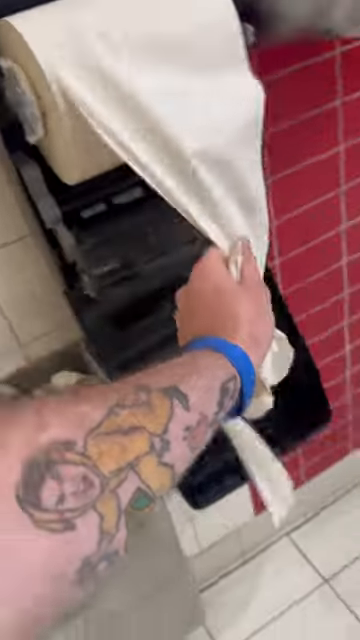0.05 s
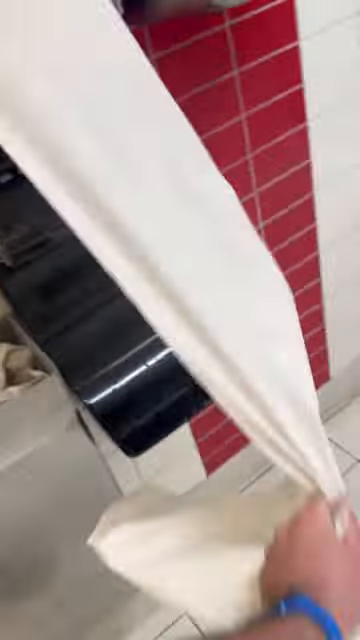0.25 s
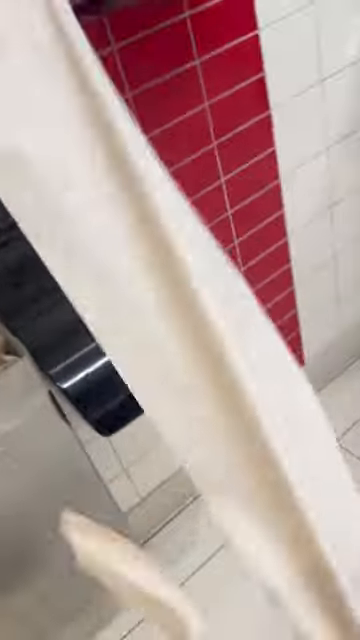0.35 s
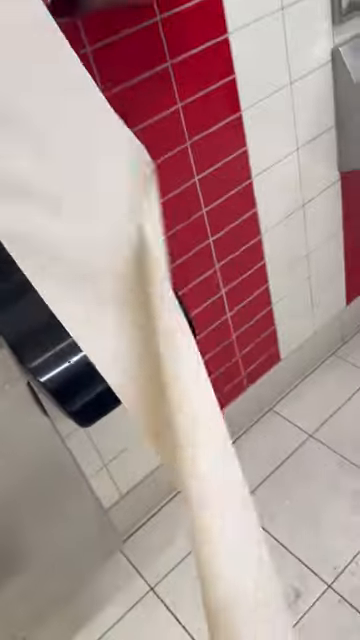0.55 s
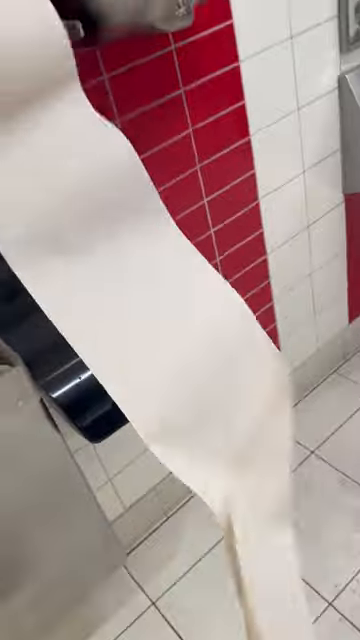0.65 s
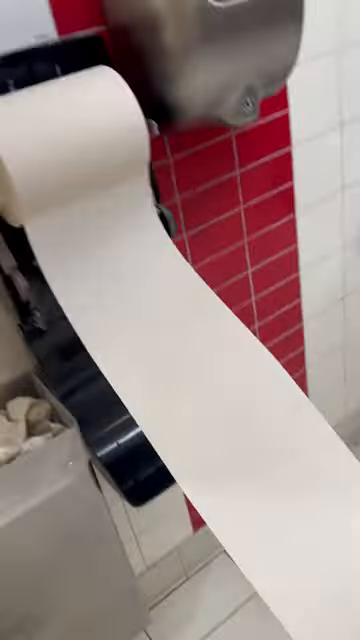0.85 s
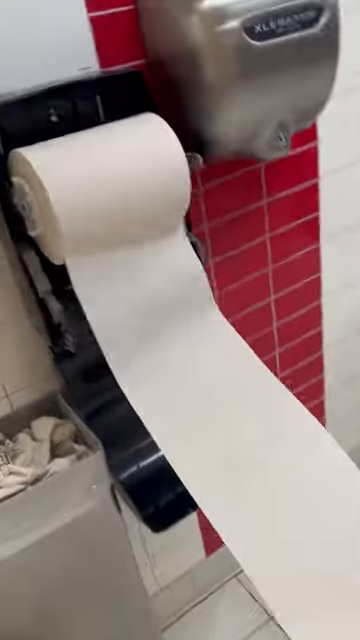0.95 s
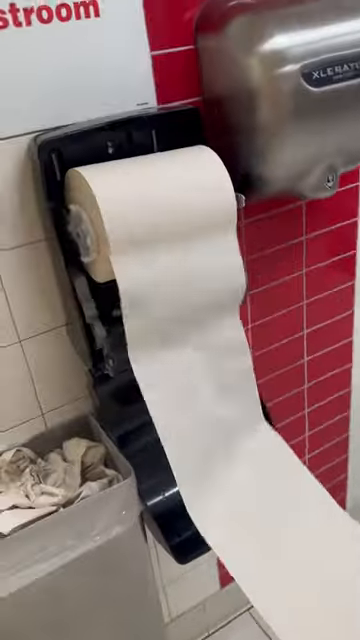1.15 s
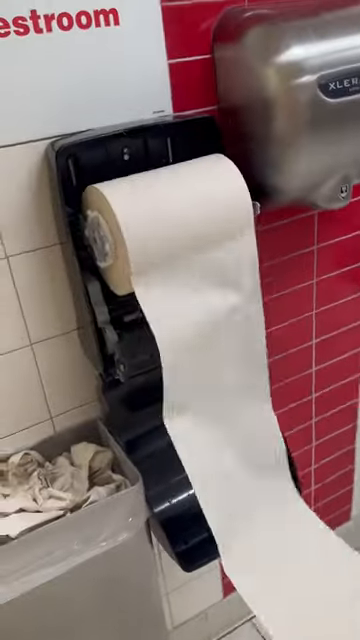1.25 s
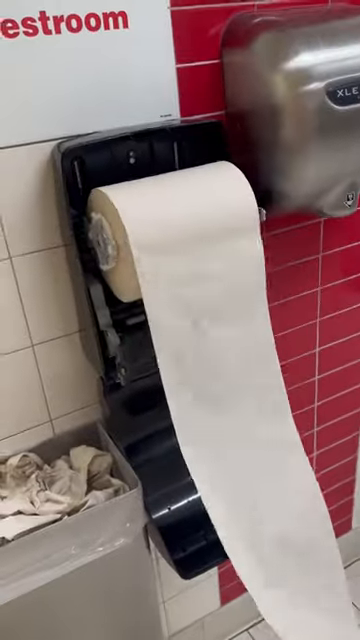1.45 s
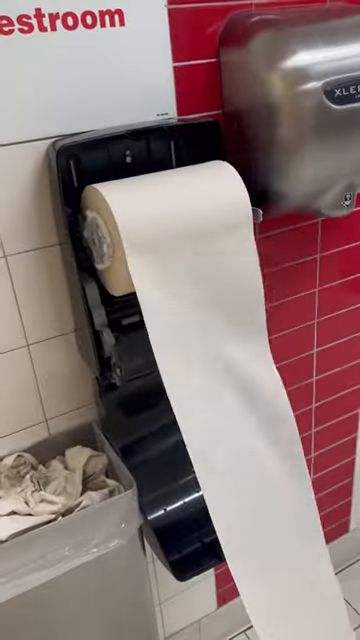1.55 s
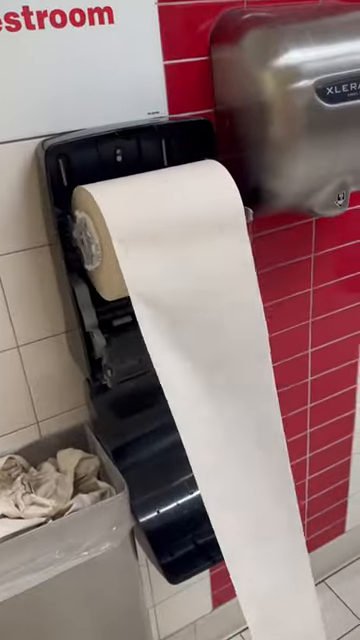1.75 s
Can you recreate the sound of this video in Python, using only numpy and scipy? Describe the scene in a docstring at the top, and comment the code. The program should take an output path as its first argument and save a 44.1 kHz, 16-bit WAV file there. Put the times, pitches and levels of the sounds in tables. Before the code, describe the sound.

A long paper towel sheet is yanked off its roll, rustling and snapping in a tiled restroom

```python
"""First comes a faint crackle of paper, then a long sheet of paper towel is yanked off its roll.
It flutters, hisses, snaps and pops in a tiled restroom: shaped noise bursts and short ringing tones.
The roll chatters in its open wall dispenser, a little to the left: random clicks ring its holder and
the plastic housing, and unsteady tones hum along. The roll fades and the hard room rings on."""
import sys
import numpy as np
from scipy import signal
from scipy.fft import rfft, irfft, next_fast_len
from scipy.io import wavfile
from scipy.ndimage import map_coordinates

SR = 44100
rng = np.random.default_rng(int(sys.argv[2]) if len(sys.argv) > 2 else 0)


def write(x):
    x = np.atleast_2d(x).T
    wavfile.write(sys.argv[1], SR, np.round(np.clip(x, -1, 1) * 32767).astype(np.int16))

N = 79380  # samples, 1.8 s
T = np.arange(N) / SR  # time of each sample, s
# In all tables, level_db is relative: the functions scale and mix the layers further.


def amp(db):
    """Turn decibels into a gain."""
    return 10 ** (np.asarray(db) / 20)


def unit(x):
    """Scale to an average strength (rms) of 1."""
    return x / np.sqrt(np.mean(x ** 2) + 1e-20)


def along(points, hz):
    """Read a table of (frequency, value) points on a log frequency axis."""
    f, v = np.transpose(points)
    return np.interp(np.log(hz + 1), np.log(f + 1), v)


def level(points):
    """Draw a gain for every sample through (time_s, level_db) points."""
    return amp(np.interp(T, *np.transpose(points)))


def filtered(x, response):
    """Multiply the spectrum of x by a response that depends on frequency."""
    m = next_fast_len(N + SR // 2)  # spare room so that the end does not wrap round
    spectrum = rfft(x, m) * response(np.fft.rfftfreq(m, 1 / SR))
    return irfft(spectrum, m)[..., :N]


def coloured(x, colour, size=2048):
    """Colour a sound without smearing it backwards in time; white noise keeps its power."""
    gain = unit(amp(along(colour, np.fft.rfftfreq(size, 1 / SR))))
    # folding the cepstrum puts the filter's energy as early as possible
    cepstrum = irfft(np.log(gain + 1e-6))
    cepstrum[1:size // 2] *= 2
    cepstrum[size // 2 + 1:] = 0
    impulse = irfft(np.exp(rfft(cepstrum)))
    return signal.fftconvolve(x, impulse[None], axes=1)[:, :N]


def resonate(x, modes, treble_hz=2000):
    """Ring a body's modes with x; the treble above about 2 kHz is weakened."""
    def response(f):
        ring = sum(amp(db) * 1j * f * w / (hz * hz - f * f + 1j * f * w) for hz, w, db in modes)
        return ring / (1 + 1j * f / treble_hz) ** 2
    return unit(filtered(x, response))


def spread(pair, side_db):
    """Use two unrelated signals as middle and side, and turn them into left and right."""
    side = amp(side_db)
    return np.array([pair[0] + side * pair[1], pair[0] - side * pair[1]]) / np.sqrt(1 + side ** 2)


def pan(left_db):
    """Channel gains that make the left louder than the right by left_db."""
    g = amp(np.array([[left_db], [-left_db]]) / 2)
    return g / g.mean()


def crackle(rate, scatter_db, smooth):
    """Two unrelated streams of tiny random clicks (rate a second) plus a share of even friction noise."""
    happens = rng.random((2, N)) < rate / SR
    sign = np.sign(rng.standard_normal((2, N)))
    size = amp(scatter_db * np.clip(rng.standard_normal((2, N)), -2, 2))
    return unit(unit(happens * sign * size) + smooth * rng.standard_normal((2, N)))


def wobble(rate):
    """A smooth random curve with rate knots a second."""
    return map_coordinates(rng.standard_normal(int(N * rate / SR) + 4), [T * rate])


def tone(hz, wander, rough_db):
    """A sine of rms 1 whose pitch (by the share wander) and level waver."""
    wavering_hz = hz * (1 + wander * wobble(90.2))
    sine = np.sin(2 * np.pi * np.cumsum(wavering_hz) / SR)
    return unit(sine * amp(rough_db * wobble(34.83)))


# how fast the tiled room dies away: frequency_hz, time_to_fall_60_db_s
TILE_DECAY = [(100, 1.4), (400, 1.18), (1200, 1.71), (3000, 0.92), (6500, 0.6), (9800, 0.23), (11500, 0.1)]


def room(x, gap_s=0.0073):
    """The dense tail of the tiled room: fading noise in which each frequency dies at its own speed."""
    hz, t, z = signal.stft(rng.standard_normal((2, SR)), SR, nperseg=256)
    fade = amp(-60 * t / along(TILE_DECAY, hz)[:, None])
    tail = signal.istft(z * fade, SR, nperseg=256)[1][:, :SR]
    build_up = 1 - np.exp(-(T[:SR] / gap_s) ** 2)
    tail *= build_up / np.sqrt(SR / np.log(10 ** 6))
    return signal.fftconvolve(x, tail, axes=1)[:, :N]


WALL_DELAY_S, WALL_SPREAD_S, WALL_DB = .011, .02, -10  # first delay, spread of delays, level


def walls(x, count=10):
    """A few early echoes from the nearest tiled walls, at random delays."""
    taps = np.zeros((2, SR // 8))
    for side in taps:
        delays = np.clip(WALL_DELAY_S + WALL_SPREAD_S * rng.random(count), 0, .1)
        side[(delays * SR).astype(int)] = rng.choice([-1, 1], count) / np.sqrt(count)
    return amp(WALL_DB) * signal.fftconvolve(x, taps, axes=1)[:, :N]


# loudness of the roll's low rumble: time_s, level_db
RUMBLE_LEVEL = [(0, -43), (.2, -43.5), (.244, -24), (.33, -28), (.39, -22), (.48, -28.5), (.556, -24.5),
                (.636, -33.5), (.722, -29), (1.098, -33.5), (1.348, -33.5), (1.484, -44), (1.574, -37),
                (1.8, -48.5)]
# tones at which the roll rings on its holder: pitch_hz, width_hz, level_db
HOLDER_MODES = [(133, 12.3, 4), (156.7, 15, 2.5), (189.8, 14, -.5), (223.7, 14, -0.5), (280, 22, -5)]
# loudness of the deep boom of wall and room: time_s, level_db
BOOM_LEVEL = [(0, -48), (.05, -46), (.18, -39.5), (.25, -35), (.6, -39.5), (.87, -29.5), (1.05, -33),
              (1.3, -32), (1.48, -39.5), (1.7, -36.5), (1.8, -48)]
# tone colour of that boom: frequency_hz, level_db
BOOM_TONE = [(15, -24), (32, -15), (45, -15), (58, -21), (66, 4), (76, -6), (92, -3.5), (115, -17.5),
             (250, -11.5), (1000, -80)]


def rumble():
    """The roll's clicks ring its holder's low modes; wall and room boom beneath as deep noise."""
    chatter = spread(crackle(rate=330, scatter_db=0.0, smooth=0.89), side_db=-19)
    holder = resonate(chatter, HOLDER_MODES)
    noise = spread(rng.standard_normal((2, N)), side_db=-29)
    boom = unit(filtered(noise, lambda hz: amp(along(BOOM_TONE, hz))))
    roll = amp(1.2) * holder * level(RUMBLE_LEVEL) * pan(left_db=6.0)
    return roll + boom * level(BOOM_LEVEL) * pan(left_db=4.5)


# loudness of the spinning roll's chatter: time_s, level_db
CHATTER_LEVEL = [(0, -49), (.08, -45), (.13, -37), (.2, -44), (.25, -30), (.32, -25), (.41, -21),
                 (.545, -23.5), (.62, -23.5), (.74, -26), (.88, -24), (1.07, -32), (1.15, -29.5),
                 (1.3, -32.5), (1.43, -36), (1.5, -39.5), (1.62, -41), (1.8, -48)]
# tones at which the plastic housing rings: pitch_hz, width_hz, level_db
HOUSING_MODES = [(369.6, 37, -3.5), (398, 30, -0.5), (441.2, 31, 2), (486.3, 17, 0.5), (613, 18, 3.5),
                 (678.5, 25, 4)]
# hum of the whirring core, rising and falling to a lower end: time_s, pitch_hz, level_db
CORE_HUM = [(.25, 478.6, -39), (.34, 456.3, -24), (.41, 432.7, -20.5), (.48, 420.4, -25), (.54, 369.3, -16),
            (.58, 368, -23), (0.631, 384.7, -32), (0.691, 414.7, -21.5), (.75, 437, -17.5),
            (.79, 400.2, -28), (0.848, 360.4, -20), (.91, 372.4, -38), (1.001, 403.9, -27),
            (1.07, 400.2, -39), (1.14, 378.2, -22.5), (1.22, 348, -30.5), (1.4, 343.6, -43),
            (1.8, 340, -57)]
# loudness of the housing's singing lowest mode: time_s, level_db
SING_LEVEL = [(.25, -48), (.46, -31), (.62, -42), (.73, -23.5), (0.852, -23.5), (.97, -26.5), (1.08, -41.5),
              (1.16, -22), (1.28, -26.5), (1.42, -32), (1.49, -48), (1.54, -31), (1.62, -45.5),
              (1.8, -50.5)]
SING_HZ = 326
HUM_WANDER, SING_WANDER = .02, .022  # unsteadiness, as a share of the pitch


def whirr(reach_octaves=.4):
    """The core hums unsteadily; its chatter rings the housing's modes, most strongly near its pitch."""
    s, pitch_hz, hum_db = np.transpose(CORE_HUM)
    centre_hz = np.interp(T, s, pitch_hz)
    chatter = spread(crackle(rate=900, scatter_db=1, smooth=1.0), side_db=-22)
    # a mode is weighted less the further, in octaves, it lies from the hum
    weights = np.array([amp(db) / (1 + (np.log2(hz / centre_hz) / reach_octaves) ** 2)
                        for hz, width, db in HOUSING_MODES])
    weights /= np.linalg.norm(weights, axis=0)
    drone = sum(w * resonate(chatter, [mode]) for w, mode in zip(weights, HOUSING_MODES))
    hum = tone(centre_hz, HUM_WANDER, rough_db=1) * amp(np.interp(T, s, hum_db))
    sing = tone(SING_HZ, SING_WANDER, rough_db=2.0) * level(SING_LEVEL)
    mix = amp(-1) * drone * level(CHATTER_LEVEL) + amp(-4.5) * hum + amp(-2.5) * sing
    return mix * pan(left_db=10)


# loudness of the moving sheet's flutter: time_s, level_db
FLUTTER_LEVEL = [(0, -49), (.08, -43.5), (.13, -35.5), (.205, -33), (.24, -15), (.325, -20.5), (.37, -19),
                 (.53, -16.5), (.63, -23.5), (.78, -21.5), (.86, -15.5), (.93, -27.5), (1.08, -25.5),
                 (1.14, -25), (1.28, -22), (1.42, -29), (1.6, -31.5), (1.8, -48.5)]
# tone colour of the flutter: frequency_hz, level_db
FLUTTER_TONE = [(120, -14), (260, -8.5), (500, 0), (750, 0), (1050, 0.5), (1400, -2), (1800, -12),
                (2600, -9), (3200, -14.5), (4200, -19), (6000, -37.5), (10000, -55), (12000, -80)]
# loudness of the hiss of sliding paper: time_s, level_db
SLIDE_LEVEL = [(0, -38.5), (.1, -34.5), (.23, -39), (.26, -28), (.33, -42), (.4, -22), (.54, -28),
               (.63, -30), (.74, -23.5), (.87, -28.5), (1.06, -32), (1.16, -27.5), (1.3, -30.5),
               (1.45, -42), (1.8, -55)]
# tone colour of that hiss: frequency_hz, level_db
SLIDE_TONE = [(800, -23), (2400, 2), (3700, -0.5), (4900, -2.5), (6200, -1.5), (7500, -1.5), (9700, -10.5),
              (10800, -54), (16000, -52)]
CLUMP_DB, CLUMPS_PER_S = 1.4, 70  # depth and speed of the unevenness


def sheet():
    """The running sheet flutters in coarse grains and hisses in fine ones, both in uneven clumps."""
    clumps = unit(amp(CLUMP_DB * wobble(CLUMPS_PER_S)))
    coarse = crackle(rate=500, scatter_db=0.5, smooth=0.62) * clumps
    flutter = coloured(coarse * level(FLUTTER_LEVEL), FLUTTER_TONE)
    fine = crackle(rate=1200, scatter_db=-1.0, smooth=0.9) * np.sqrt(clumps)
    slide = coloured(fine * level(SLIDE_LEVEL), SLIDE_TONE)
    return amp(-1.5) * flutter + amp(-3.5) * slide


# tone colour of the small creases: frequency_hz, level_db
CREASE_TONE = [(400, -18.5), (1200, 7), (2300, 0), (3600, -5), (6200, -9), (9500, -20.5), (11000, -52)]
CREASES_PER_S, CREASE_T60_S = 110, .01  # how many; time for each to fall by 60 dB
CREASE_SCATTER_DB, CREASE_DB = 2.5, -6.5  # scatter of size; level


def crinkles():
    """Small creases tick at random as short noise bursts, harder when the sheet flutters and slides more."""
    happens = rng.random(N) < CREASES_PER_S / SR
    # twice the decibels, because these are powers
    starts = happens * amp(2 * CREASE_SCATTER_DB * np.clip(rng.standard_normal(N), -2, 2))
    power = np.abs(signal.fftconvolve(starts, amp(-60 * T / CREASE_T60_S) ** 2)[:N])
    ticks = unit(np.sqrt(power) * rng.standard_normal((2, N)))
    effort = np.sqrt(level(FLUTTER_LEVEL) * level(SLIDE_LEVEL))
    return amp(CREASE_DB) * coloured(ticks * effort, CREASE_TONE)


# hollow pops as the sheet buckles: start_s, level_db, pitch_hz, time_to_fall_60_db_s
BUCKLES = [(.09, -19, 1180, 0.035), (.124, -21, 1025, .04), (.157, -17.5, 1093, 0.049),
           (.2135, -9, 1022, 0.038), (0.249, -11, 1340, 0.055), (0.3471, -4, 1043, 0.061),
           (.678, -12.5, 1403, 0.049), (.807, -10, 1088, 0.054), (.866, -11, 816, 0.075),
           (.874, -11, 1065, 0.038), (0.9462, -4, 1535, 0.027), (.967, -9, 1443, 0.037),
           (.989, -14, 1923, 0.041), (1.211, -19, 1156, .04), (1.2396, -4.5, 1378, 0.019),
           (1.251, -4.5, 1555, 0.021), (1.47, -23.5, 1160, 0.089)]
# the tones within one pop: ratio_to_pitch, level_db
POP_PARTIALS = [(.73, -3), (1, 1), (1.12, -5.5), (1.48, -9), (1.85, -11)]
POP_DB, POP_ATTACK_S = -2.5, 0.00055


def pops():
    """The buckling sheet pops like a slack drumhead: fading sines that all start together."""
    out, t = np.zeros((2, N + SR)), T[:SR // 8]
    for start_s, db, hz, t60 in BUCKLES:
        phase = rng.random((2, 1))
        ring = sum(amp(part_db) * np.sin(2 * np.pi * (hz * ratio * t + phase))
                   for ratio, part_db in POP_PARTIALS)
        fade = amp(db + POP_DB - 60 * t / t60) * (1 - np.exp(-t / POP_ATTACK_S))
        out[:, round(start_s * SR):][:, :len(t)] += fade * ring
    return out[:, :N]


# sharp snaps of the sheet: start_s, level_db, hold_s (before the release), low_body_db
SNAPS = [(.0533, -28.5, 0.00053, -2), (.089, -40.5, 0.0068, 6), (0.125, -45.5, 0.0046, 7),
         (0.156, -37, .009, 2.5), (.2118, -30, 0.0025, 9), (.2425, -23.5, 0.0015, 2),
         (.245, -18.5, 0.0036, 2.5), (.251, -22.5, 0.0052, 0.5), (.338, -23.5, 0.0059, -1),
         (0.3457, -20, 0.0025, 7), (0.373, -15.5, 0.0047, -1.5), (0.38, -26.5, .016, 3),
         (.497, -20, 0.007, 3.5), (0.531, -22.5, .009, 1.5), (.678, -15, 0.0088, -1.5),
         (0.8042, -21.5, 0.0068, 2), (.831, -16, 0.0055, -5), (0.947, -26, 0.0024, -3),
         (.985, -22.5, 0.012, 4), (1.1005, -23, 0.0022, 5), (1.127, -25.5, .017, 5.5),
         (1.236, -32, 0.0033, 7.5), (1.251, -27, 0.0085, -1.5), (1.428, -40, 0.0056, -5),
         (1.467, -41.5, .025, 6)]
# tone colour of the bright crack: frequency_hz, level_db
SNAP_TONE = [(600, -23), (2400, -6.5), (3800, 0), (4800, -2.5), (6000, 0.5), (7500, -3), (9800, -10.5),
             (10900, -40.5), (16000, -57)]
# tone colour of the low body: frequency_hz, level_db
BODY_TONE = [(100, -21.5), (400, -3.5), (1300, -1), (2500, -3.5), (3500, -13.5), (6000, -36), (12000, -75)]
# tone colour of the very top, added mainly to the loudest snaps: frequency_hz, level_db
TOP_TONE = [(7000, -54), (10000, -20), (11500, -23), (13000, -6), (14500, 25), (16000, -1)]
SNAP_ATTACK_S, SNAP_RELEASE_S = .00015, .0022
FIRST_CREASE_DB, FIRST_CREASE_S = 4, .002  # the first crease to give way stands out


def snaps():
    """Each snap is a noise burst of creases giving way; returns its main sound and its very top."""
    crack, body = np.zeros((2, N))
    for start_s, db, hold_s, body_db in SNAPS:
        t = np.maximum(T - start_s, 0)
        burst = amp(db + FIRST_CREASE_DB * np.exp(-t / FIRST_CREASE_S))
        burst *= 1 - np.exp(-t / SNAP_ATTACK_S)
        burst *= np.exp(-np.maximum(t - hold_s, 0) / SNAP_RELEASE_S)
        crack += burst
        body += amp(body_db) * burst
    creases = crack * crackle(rate=4000, scatter_db=1.0, smooth=0.67)
    low = body * crackle(rate=3000, scatter_db=0.0, smooth=1.0)
    main = coloured(creases, SNAP_TONE) + coloured(low, BODY_TONE)
    mostly_loudest = creases * (crack / crack.max()) ** 2
    return main, amp(-13.0) * coloured(mostly_loudest, TOP_TONE)


# stereo width of the paper: frequency_hz, side_against_middle_db
PAPER_WIDTH = [(200, -7), (450, -4), (750, -7), (1150, -3.5), (1500, -10), (1950, -14), (2800, -3),
               (3800, -3.5), (4800, -1), (6500, -6.5), (10000, 0)]


def widen(pair):
    """Turn two unrelated streams into left and right, with a width that depends on frequency."""
    def middle_and_side(hz):
        side = amp(along(PAPER_WIDTH, hz))
        return np.array([np.ones_like(hz), side]) / np.hypot(1, side)
    mid, side = filtered(pair, middle_and_side)
    return np.array([mid + side, mid - side])


def scene():
    """The paper and its echo from the tiles, over the roll; the snaps' very top is added dry, without echo."""
    rustle = sheet() + crinkles()
    cracks, top = snaps()
    buckles = pops()
    echo = walls(cracks) + room(amp(-4.5) * rustle + amp(1.5) * cracks + amp(-6) * buckles)
    paper = widen(rustle + cracks + top + buckles + echo) * pan(left_db=-0.4)
    return paper + whirr() + rumble()


# phase between the two microphone ports: frequency_hz, right_leads_by_radians
PORT_PHASE = [(150, -0.7), (280, 0.4), (560, 2), (880, 1.5), (1300, 0), (2700, -0.47), (4500, 0), (6200, 1),
              (8200, 2.22), (10500, 1)]
TOP_HZ = 16400  # band limit


def record(dry):
    """The ports differ in phase; the microphone rounds high peaks and drops all above its band limit."""
    half_turn = np.array([[-1], [1]]) / 2  # half the phase to each side
    ports = filtered(dry, lambda hz: np.exp(1j * along(PORT_PHASE, hz) * half_turn))
    rounded = ports / (1 + np.abs(ports) ** 8) ** (1 / 8)
    return filtered(rounded, lambda hz: hz < TOP_HZ)


dry = scene()
out = record(dry)
write(out)
```